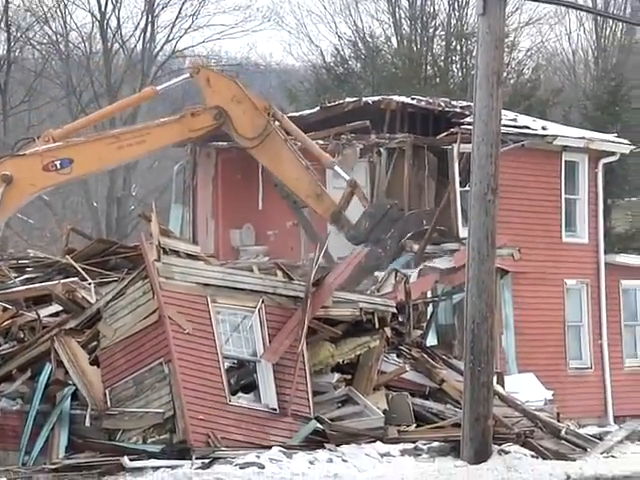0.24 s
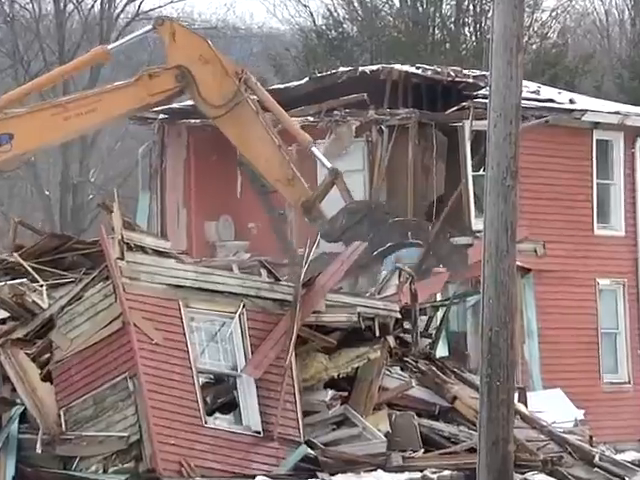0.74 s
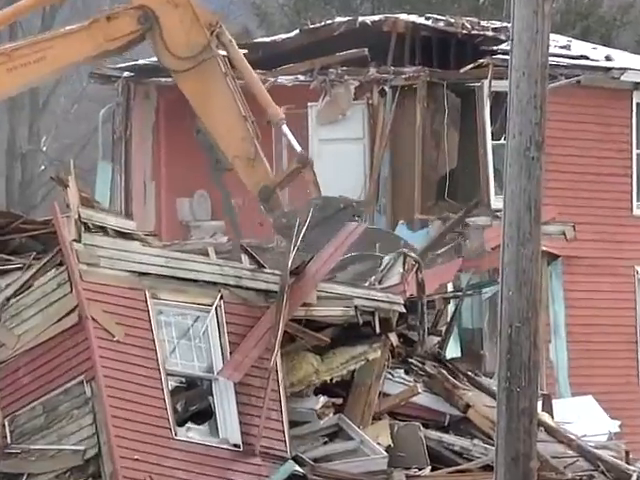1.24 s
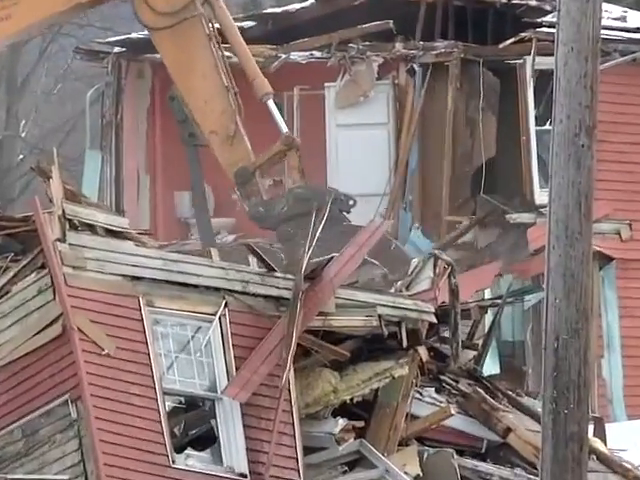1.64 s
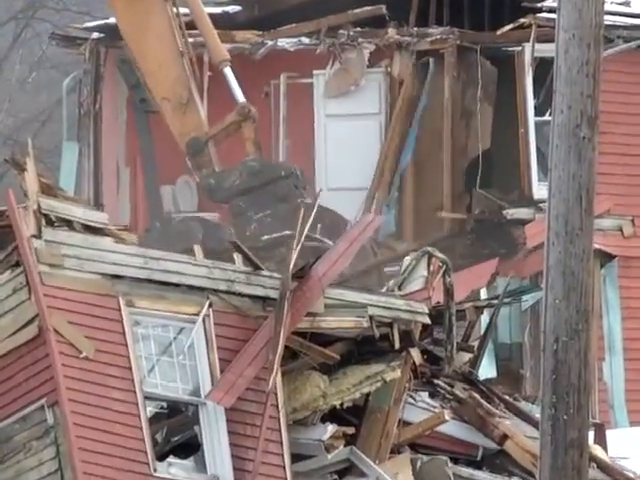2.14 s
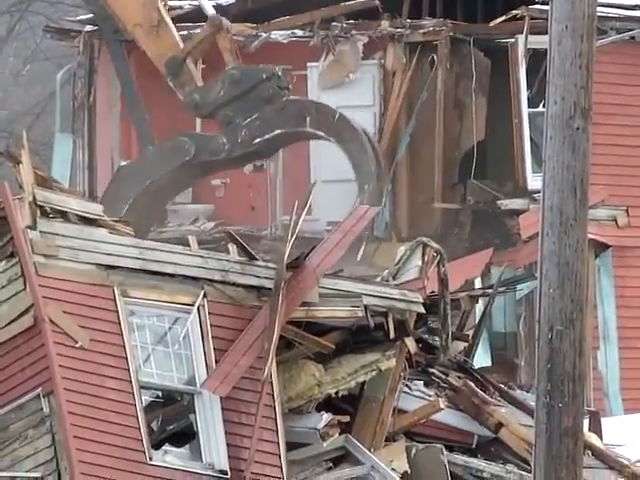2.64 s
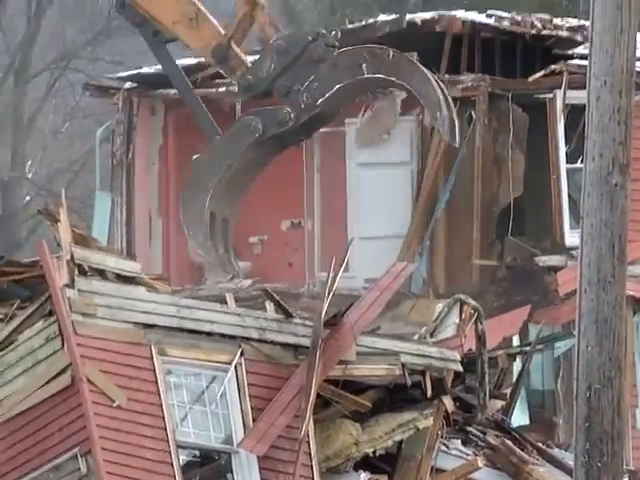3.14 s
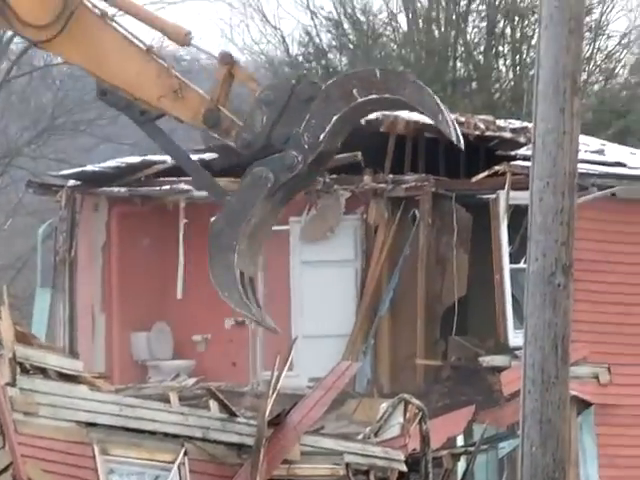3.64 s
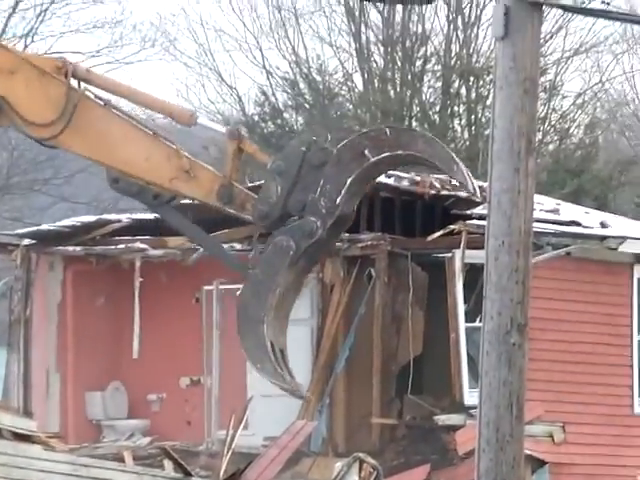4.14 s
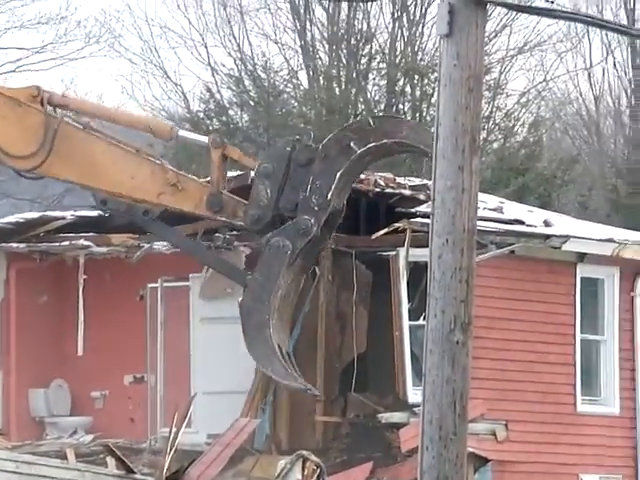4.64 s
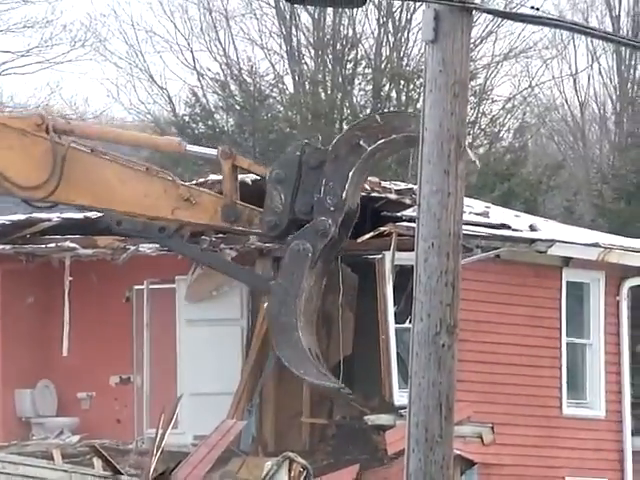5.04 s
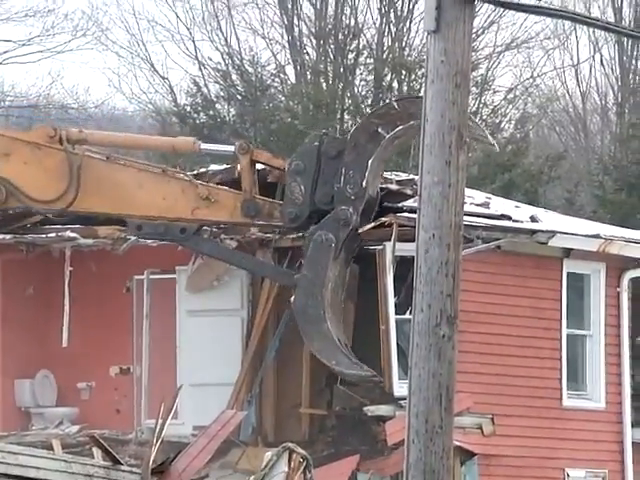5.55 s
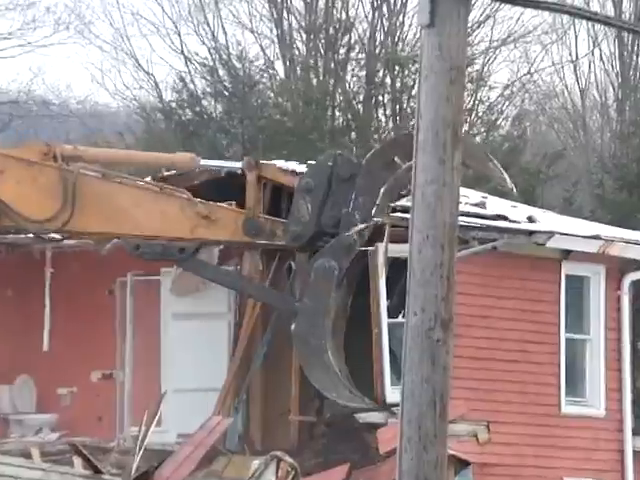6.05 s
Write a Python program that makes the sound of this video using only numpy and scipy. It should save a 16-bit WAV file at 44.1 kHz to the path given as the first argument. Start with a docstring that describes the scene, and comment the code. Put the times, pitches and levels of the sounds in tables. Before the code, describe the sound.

A diesel excavator works outdoors across a street, its steady rough roar of fan, exhaust and engine filling the whole stretch over low rumble, with faint treble clatter and hiss. At 0.3 s timber breaks very loudly: a cluster of hard, bright cracks with grainy crunching. Wooden knocks and sliding boards tumble on until about 1.2 s, with heavy soft thuds around 0.9 and 1.1 s and a last crack slightly left. At 1.64 s a tiny, dry splinter snaps close on the right. Then mostly machine: from 2.4 s a hydraulic moan near 900 Hz and a pump whine near 600 Hz waver and swell. Between 4.15 and 4.7 s duller boards knock, slide and thump; a low thud comes at 5.2 s and one more knock at 5.4 s. The moan climbs slightly and strengthens as it ends at 6.3 s. Wide, drifting stereo image, treble slightly limited.

```python
"""Across a street from a wooden house, a diesel excavator works its grapple.
Exhaust, fan and engine roar are shaped noises; pump, firing and throb are sines; a hydraulic moan is narrow noise.
Boards break and tumble early, a few more later: bursts ring wooden modes, thuds are swelling sines.
One splinter snaps close by on the right. Two close microphone ports, widened electronically, give a drifting image."""
import sys
import numpy as np
from scipy import signal
from scipy.fft import rfft, irfft
from scipy.io import wavfile

SR = 44100
rng = np.random.default_rng(int(sys.argv[2]) if len(sys.argv) > 2 else 0)


def to_wav(s):
    """Save 16-bit WAV."""
    ch = np.atleast_2d(s).T  # columns
    pcm = np.round(np.clip(ch, -1, 1) * 32767)  # PCM
    wavfile.write(sys.argv[1], SR, pcm.astype(np.int16))


N = 278112


def amp(db):
    """Decibels to gain."""
    return 10 ** (np.asarray(db) / 20)


def rms_one(x):
    """Scale to rms 1."""
    return x / np.sqrt(np.mean(x ** 2) + 1e-20)


def in_time(rows):
    """Columns of a time table, interpolated at every sample."""
    time_s, *columns = np.transpose(rows)
    return [np.interp(np.arange(N) / SR, time_s, column) for column in columns]


def over_hz(points):
    """Frequency table at every FFT bin, interpolated over log frequency."""
    hz = np.maximum(np.arange(N // 2 + 1) * SR / N, 1)
    table = np.array(points)
    return np.interp(np.log(hz), np.log(table[:, 0]), table[:, 1])


def noise_pair(spectrum):
    """Two unrelated noises of one colour, rms 1, silent outside the table."""
    hz = np.arange(N // 2 + 1) * SR / N
    inside = (hz > spectrum[0][0]) & (hz < spectrum[-1][0])
    white = rng.standard_normal((2, N))
    return rms_one(irfft(rfft(white) * amp(over_hz(spectrum)) * inside, N))


def drift(rate_hz):
    """Slow chance, rms 1: white noise through a double one-pole low-pass."""
    r = np.exp(-2 * np.pi * rate_hz / SR)
    white = rng.standard_normal(N + SR)
    return rms_one(signal.lfilter([1], [1, -2 * r, r * r], white)[SR:])   # first second lets it settle


def wandering_band(hz, width_hz):
    """Two noises in a narrow band: slow chance on a carrier that follows hz."""
    phase = 2 * np.pi * np.cumsum(hz) / SR
    strands = [drift(width_hz) * np.cos(phase) + drift(width_hz) * np.sin(phase) for _ in range(2)]
    return rms_one(np.array(strands))


def ring(clicks, hz, t60_s):
    """Two-pole resonance: a unit click starts a decaying sine of initial height 1."""
    r = amp(-60 / (t60_s * SR))
    w = 2 * np.pi * hz / SR
    return signal.lfilter([0, np.sin(w)], [1, -2 * r * np.cos(w), r * r], clicks + 1e-18)


def swell(start_s, level_db, hold_s, rise_s, fade_s):
    """Gain that climbs 20 dB per rise time, holds, and sinks 20 dB per fade time."""
    t = np.arange(N) / SR - start_s
    rise_db = 20 * np.maximum(-t / rise_s, 0)
    fade_db = 20 * np.maximum((t - hold_s) / fade_s, 0)
    return amp(level_db - rise_db - fade_db)


def ports(pair, width_db, share, turn_rad=0):
    """Port sum and raw difference: part of the difference follows the sum, the rest is scattered sound."""
    total, scattered = pair
    share = np.clip(share, 0, 1)
    quarter = irfft(1j * rfft(total), N) if np.any(turn_rad) else 0   # sum, a quarter cycle ahead
    direct = np.cos(turn_rad) * total + np.sin(turn_rad) * quarter
    difference = share * direct + np.sqrt(1 - share ** 2) * scattered
    return np.array([total, amp(width_db) * difference])


# engine levels: (time [s], exhaust [dB], low roar [dB], high roar [dB], clatter [dB])
ENGINE_LEVELS = [(0.0, -31.5, -23.5, -27.5, -42.5), (0.24, -31.5, -24.5, -33, -43.5),
                 (0.49, -27, -23.5, -28, -40.5), (0.79, -32, -27, -29, -44),
                 (.93, -33.5, -26.5, -27.5, -39), (1.09, -31.5, -24, -27.5, -41),
                 (1.23, -31, -25.5, -30.5, -44.5), (1.63, -33.5, -27.5, -32, -48.5),
                 (2.58, -35, -24, -28.5, -49), (2.91, -35, -23, -28, -48.5),
                 (3.39, -33.5, -22.5, -26, -46.5), (3.76, -33, -22.5, -24, -46),
                 (4.13, -30, -21, -23.5, -45.5), (4.46, -28.5, -21.5, -28.5, -43),
                 (4.81, -30, -24, -28.5, -45.5), (5.09, -32.5, -25, -26.5, -47.5),
                 (5.41, -32, -22.5, -26, -44), (5.8, -32.5, -22.5, -24, -44), (6.31, -30, -22, -21, -44)]
FIRING_HZ, FIRING_GATE = 100.6, 0.065   # gate: depth of the roar's breathing


def engine():
    """Exhaust, roar and clatter noises over low tones; roar and clatter breathe with each firing."""
    exhaust_db, low_db, high_db, clatter_db = in_time(ENGINE_LEVELS)
    t = np.arange(N) / SR
    firing = np.sin(2 * np.pi * (FIRING_HZ * t + 0.1 * drift(2.0)))
    gate = (1 + FIRING_GATE * firing) * amp(0.63 * drift(43))
    return (roar(low_db, high_db, clatter_db, gate) + clatter(clatter_db, gate) + hiss(clatter_db)
            + bass(exhaust_db) + engine_tones(firing))


# image drift: (time [s], low roar width [dB], high roar width [dB], share following the sum [0-1], phase turn [rad])
IMAGE_DRIFT = [(0, 2, 7, 0.02, 0.54), (.8, 1.5, 1.5, .25, -0.44), (1.4, 3.5, 5, 0.22, -0.22),
               (2.1, -0.5, 4, 0.5, -0.67), (3, -5, 1.5, 0.65, -0.96), (3.8, -4, -2, .25, -0.46),
               (4.2, -0.5, 0, 0, 0.7), (4.5, 2.5, 6, 0.4, 0.9), (5, 1, 1, 0.37, .22),
               (5.7, 4, 0.5, 0.2, 0.45), (6.31, -1.5, -5, 0.09, 0.22)]
# noise spectra: (frequency [Hz], relative density [dB per Hz])
LOW_ROAR_SPECTRUM = [(280, -17.5), (400, -6.5), (500, -6), (600, -3.5), (700, -4.5), (900, -1.5),
                     (1200, -2.5), (1500, -10.5), (2000, -70)]
HIGH_ROAR_SPECTRUM = [(900, -10.5), (1200, -9), (1450, 0.5), (1680, 0), (1850, -7), (2100, -10),
                      (2600, -59)]
UPPER_ROAR_SPECTRUM = [(1600, -12), (1900, 0.5), (2260, 1), (2580, -5.5), (2800, -14), (3300, -23)]
UPPER_DB = 1   # over the mean of high roar and clatter levels


def roar(low_db, high_db, clatter_db, gate):
    """Fan and engine noise in three bands; the hydraulic moan shares the low band's image."""
    low_width_db, high_width_db, share, turn_rad = in_time(IMAGE_DRIFT)
    low = amp(low_db) * noise_pair(LOW_ROAR_SPECTRUM) * gate + moan() + strand()
    upper_db = UPPER_DB + (high_db + clatter_db) / 2   # top of the roar dulls together with the clatter
    high = amp(high_db) * noise_pair(HIGH_ROAR_SPECTRUM)
    upper = amp(upper_db) * noise_pair(UPPER_ROAR_SPECTRUM)
    return ports(low, low_width_db, share, turn_rad) + ports((high + upper) * gate, high_width_db, share, turn_rad)


# rough hydraulic moan: (time [s], pitch [Hz], level of the wide band [dB])
MOAN_CURVE = [(0, 878, -47), (1.2, 873.5, -36.5), (2.3, 920, -48), (2.43, 910, -30), (2.6, 910, -52),
              (2.76, 920, -29), (2.9, 900, -32), (3.05, 895, -29), (3.17, 935, -29), (3.3, 955, -27),
              (3.4, 930, -36), (3.48, 920, -30.5), (3.6, 951, -24.5), (3.75, 880, -34), (3.95, 930, -25),
              (4.08, 899, -26.5), (4.2, 968, -29.5), (4.35, 958, -32.5), (4.48, 928, -31), (4.6, 960, -29),
              (4.75, 880, -30.5), (5.0, 902, -32.5), (5.2, 958, -31), (5.35, 922, -26), (5.52, 910, -26.5),
              (5.62, 996, -33), (5.75, 945.5, -26), (5.95, 1005, -34), (6.1, 968, -53), (6.22, 1014, -28.5),
              (6.31, 1026, -22.5)]
MOAN_WIDTH_HZ = 69
MOAN_CORE_HZ, MOAN_CORE_DB = 25, -5   # narrower strand: width, level re wide band


def moan():
    """Hydraulic moan: a wide and a narrow noise band around one gliding pitch."""
    moan_hz, moan_db = in_time(MOAN_CURVE)
    wide = wandering_band(moan_hz, MOAN_WIDTH_HZ)
    core = amp(MOAN_CORE_DB) * wandering_band(moan_hz, MOAN_CORE_HZ)
    return amp(moan_db) * (wide + core)


# higher strand under load: (time [s], pitch [Hz], level [dB])
STRAND_CURVE = [(0, 1076, -60), (3.3, 1017, -34), (3.46, 1020, -29), (3.62, 988, -36), (3.7, 1070, -49),
                (3.9, 1084, -34), (4.1, 1108, -49), (5.05, 1007, -42), (5.17, 1015, -24.5),
                (5.28, 1090, -33), (5.39, 1122, -33), (5.46, 1060, -28), (5.55, 1120, -31),
                (5.62, 1080, -27), (5.68, 1113, -52), (5.77, 1110, -39), (6.31, 1100, -48)]
STRAND_WIDTH_HZ = 19


def strand():
    """Higher strand that joins the moan under load: one narrow gliding noise band."""
    strand_hz, strand_db = in_time(STRAND_CURVE)
    return amp(strand_db) * wandering_band(strand_hz, STRAND_WIDTH_HZ)


# valve gear: (frequency [Hz], relative density [dB per Hz])
CLATTER_SPECTRUM = [(2300, -21), (2700, -1), (3200, 11.5), (4000, 5.5), (4700, -4), (5300, -5), (5800, -11),
                    (6300, -14.5), (7000, -50), (8500, -45)]
CLATTER_WIDTH_DB = 2.5


def clatter(clatter_db, gate):
    """Valve gear: treble noise gated by the firing."""
    return ports(amp(clatter_db) * noise_pair(CLATTER_SPECTRUM) * gate, CLATTER_WIDTH_DB, 0.75)


# hiss: (frequency [Hz], relative density [dB per Hz])
HISS_SPECTRUM = [(5000, -9), (6200, 2.5), (7500, 10), (9000, 7), (10800, 9), (12500, 8), (15200, 10.5),
                 (16500, 3)]
HISS_DB, HISS_FOLLOWS = -58, 0.41   # share of the clatter's level changes in dB


def hiss(clatter_db):
    """High noise that partly follows the clatter level."""
    level_db = HISS_DB + HISS_FOLLOWS * (clatter_db - clatter_db.mean())
    return ports(amp(level_db) * noise_pair(HISS_SPECTRUM), -1.5, 0.12)


# spectra: (frequency [Hz], relative density [dB per Hz])
EXHAUST_SPECTRUM = [(76, -20), (130, -3.5), (150, 1), (204, 2), (322, -4.5), (400, -6.5), (520, -12.5),
                    (880, -120)]
RUMBLE_SPECTRUM = [(14, -32), (22, -17), (34, -7), (44, -9), (56, 3.5), (66, -3), (76, 0), (90, -2.5),
                   (124, -3.5), (135, -10), (170, -15), (290, -100)]
# ground rumble: (time [s], level [dB])
RUMBLE_CURVE = [(0.0, -37.5), (1.05, -31.5), (1.58, -40), (2.62, -34), (3.13, -39), (3.44, -34.5),
                (4.0, -36.5), (5.6, -33.5), (6.31, -37.5)]
RUMBLE_WAVER_DB = 1


def bass(exhaust_db):
    """Exhaust noise over ground rumble with a wavering level."""
    rumble_db = in_time(RUMBLE_CURVE)[0] + RUMBLE_WAVER_DB * drift(3.4)
    rumble = amp(rumble_db) * noise_pair(RUMBLE_SPECTRUM)
    return ports(rumble + amp(exhaust_db) * noise_pair(EXHAUST_SPECTRUM), -0.93, 0.44)


FIRING_DB = -39.5
THROB_HZ, THROB_DB = 27.2, -41.5


def engine_tones(firing):
    """Firing tone and a slow low hum, both unsteady in level and phase."""
    t = np.arange(N) / SR
    firing_tone = amp(FIRING_DB + 1.1 * drift(5.0)) * firing
    throb = np.sin(2 * np.pi * (THROB_HZ * t + 0.09 * drift(1.4)))
    throb = amp(THROB_DB + 3.7 * drift(1.8)) * throb
    return np.sqrt(2) * (firing_tone + throb) * [[1], [.45]]   # levels are rms in the sum


# pump whine: (time [s], second multiple of piston rate [Hz], its level [dB])
PUMP_CURVE = [(0, 597, -38), (1.9, 598, -44.5), (1.97, 598, -36), (2.26, 598, -34), (2.41, 598, -43),
              (2.5, 600, -31.5), (2.6, 599, -40), (2.76, 598, -26.5), (2.85, 598, -37), (2.92, 596, -63),
              (3.03, 586, -31.5), (3.25, 586, -35), (3.42, 594, -40), (3.55, 600, -30.5), (3.8, 594, -48),
              (3.98, 587, -31), (4.2, 592, -43), (4.36, 602, -27), (4.55, 598, -41), (4.72, 596, -42),
              (4.79, 596, -32.5), (4.9, 597, -41), (5, 597, -35), (5.06, 597, -51), (5.14, 598, -28.5),
              (5.3, 594, -36), (5.45, 590, -34), (5.62, 598, -37), (5.76, 596, -35), (5.88, 592, -29.5),
              (5.94, 594, -43), (6.02, 596, -26), (6.18, 594, -45), (6.31, 590, -21)]
PISTON_DB, PUMP_WAVER_DB = -42.5, 1.8


def pump():
    """Piston rate of the hydraulic pump and its second multiple, wavering in level."""
    second_hz, second_db = in_time(PUMP_CURVE)
    phase = 2 * np.pi * (np.cumsum(second_hz / 2) / SR + 0.05 * drift(7.5))
    second = amp(second_db + PUMP_WAVER_DB * drift(17)) * np.sin(2 * phase)
    first = amp(PISTON_DB + PUMP_WAVER_DB * drift(2.4)) * np.sin(phase)
    return np.sqrt(2) * (first + second) * [[1], [.6]]


# breaking timber: (time [s], peak before pan [dB], pitch struck hardest [Hz], pan, left over right [dB])
TIMBER_BLOWS = [(.285, -15, 1300, -4), (0.3153, -1, 1560, -2), (0.322, -24, 1300, -4),
                (0.3265, -2, 1600, 0), (.3312, -1.5, 750, -3), (.340, -3.5, 620, -1), (.349, -20, 500, -3),
                (0.359, -6.5, 1110, -6), (0.3665, -6, 1000, -1), (0.385, -10, 750, -4),
                (.398, -12, 520, -4), (0.421, -19, 520, -1), (.428, -12, 1050, 0), (0.455, -12, 480, 0),
                (.505, -13, 500, -2), (.524, -6, 600, -2), (0.581, -13, 500, -2), (0.5965, -12, 1900, 2),
                (.605, -14, 800, -1), (.619, -15, 500, -2), (.635, -8.5, 446, -1), (0.6565, -9, 1580, -1),
                (.665, -16, 1900, 0), (0.679, -20, 1100, 0), (0.731, -10, 1080, 1), (.787, -15, 1450, 1),
                (.831, -8.5, 410, -4), (.910, -12, 560, -2), (.973, -19, 1450, -1), (.997, -17, 520, -4),
                (1.048, -14, 1300, -5), (1.137, -9.5, 1500, 4), (1.147, -21, 1840, 6),
                (1.157, -8.5, 1550, 5), (1.167, -19, 1550, 12), (4.16, -9, 700, -2), (4.35, -21, 594, -3),
                (4.43, -9, 650, 0), (4.56, -13, 959, 0), (4.68, -10, 1080, 3), (5.3585, -7, 1030, 0)]
# timber modes: (frequency [Hz], level [dB], t60 [s])
TIMBER_MODES = [(252, -10, 0.028), (420, -2.5, 0.084), (540, 1, 0.05), (700, 3.5, 0.024), (1080, 5.5, 0.03),
                (1547, 6.5, 0.038), (1860, 3, 0.011), (2320, 5, 0.022), (3350, -8, 0.0075),
                (4060, -20, .007), (5540, -14, 0.0044)]
HARD_HZ, SOFTER_DB_PER_OCTAVE = 5000, 10.5   # low-pass at 0 dB peak; an octave lower per 10.5 dB weaker
PITCH_SPREAD, UNEVEN_DB = 0.013, 1.5   # relative pitch spread of boards, spread of mode strengths
FOCUS_DB_PER_OCTAVE = -17   # modes away from the pitch struck ring less
SPLINTERING_S, SPLINTERING_DB = .0025, -21   # decay constant, level re first contact


def blows():
    """Breaking boards: contact and short splintering burst into the timber's modes, weaker ones duller."""
    out, length = np.zeros((2, N)), SR // 5
    t = np.arange(length) / SR
    for time_s, peak_db, struck_hz, pan_db in TIMBER_BLOWS:
        pitch = 1 + PITCH_SPREAD * rng.standard_normal()
        burst = amp(SPLINTERING_DB) * rng.standard_normal((2, length)) * np.exp(-t / SPLINTERING_S)
        burst[0, 0] += 1   # first contact
        burst[1] = 0.65 * burst[0] + 0.15 * burst[1]   # sides partly alike
        body = np.zeros((2, length))
        for hz, db, t60_s in TIMBER_MODES:
            focus_db = FOCUS_DB_PER_OCTAVE * abs(np.log2(hz / struck_hz))
            mode_db = db + focus_db + UNEVEN_DB * rng.standard_normal()
            body += amp(mode_db) * ring(burst, hz * pitch, t60_s)
        soften_hz = HARD_HZ * 2 ** (peak_db / SOFTER_DB_PER_OCTAVE)
        body = signal.sosfilt(signal.butter(4, soften_hz, fs=SR, output="sos"), body)
        hit = body / np.abs(body).max()
        at = round(time_s * SR)
        out[:, at:at + length] += amp(peak_db) * hit * amp([[pan_db / 2], [-pan_db / 2]])
    return out


# bright cracks: (time [s], tearing level before the rings [dB])
CRACK_TIMES = [(.3155, -48), (.3268, -37), (.3295, -35), (.345, -46), (.367, -48)]
# crack modes: (frequency [Hz], level [dB], t60 [s], sides [1 = alike, -1 = opposed])
CRACK_RINGS = [(3350, -2, .005, 1), (4000, -5, .005, 1), (5700, -12, .004, 1), (6800, -19, .004, 1),
               (9000, -21, .005, 1), (9400, -10, .006, -1), (10700, -4, .006, -1), (15000, -30, .003, 1)]
CRACK_S = .002   # decay constant of the tearing


def cracks():
    """Bright cracks: spurts of tearing noise into short high rings."""
    t = np.arange(N) / SR
    spurts = sum(amp(db) * (t >= time_s) * np.exp(-np.maximum(t - time_s, 0) / CRACK_S)
                 for time_s, db in CRACK_TIMES)
    tearing = spurts * rng.standard_normal(N)
    return sum(amp(db) * ring(tearing, hz, t60_s) * np.array([[1], [sides]])
               for hz, db, t60_s, sides in CRACK_RINGS)


# splinter modes: (frequency [Hz], level [dB], t60 [s])
SPLINTER_RINGS = [(2000, 0, .005), (2650, 5, .005), (3650, 1, .005), (4450, -7, .005), (5500, -14, .004),
                  (6500, -22, .004), (7900, -10, .005), (9100, -4, .005), (10200, 1, 0.005),
                  (12500, -22, .003), (15000, -24, .003)]
SPLINTER_S, SPLINTER_DB, SPLINTER_PAN_DB = 1.6364, -2, -8   # time, gain, left re right
SWELL_S, DYING_S = .0011, .0004   # time constants
TONE_HZ, TONE_HOLD_S, NOISE_DB = 2300, .0009, -5   # tone pitch and hold, peak of the rung noise


def splinter():
    """Close snap: noise and a short 2.3 kHz tone swell over a few milliseconds, then stop."""
    t = np.arange(N) / SR - SPLINTER_S
    rise = np.exp(np.minimum(t, 0) / SWELL_S)
    noise = rng.standard_normal(N) * rise * np.exp(-np.maximum(t, 0) / DYING_S)
    tone = rise * np.exp(-np.maximum(t - TONE_HOLD_S, 0) / DYING_S) * np.sin(2 * np.pi * TONE_HZ * t)
    rung = sum(amp(db) * ring(noise, hz, t60_s) for hz, db, t60_s in SPLINTER_RINGS)
    snap = amp(NOISE_DB) * rung / np.abs(rung).max() + tone
    # widening turns the far channel over
    return amp(SPLINTER_DB) * snap * np.array([[-amp(SPLINTER_PAN_DB)], [1]])


# fibre noise: (frequency [Hz], relative density [dB per Hz])
CRUNCH_SPECTRUM = [(700, -5), (1200, 6.5), (2000, 1.5), (2700, -15), (3600, -14.5), (5000, -26),
                   (6500, -30), (9000, -50), (13000, -51)]
# crunches: (start [s], level [dB], hold [s], rise per 20 dB [s], fade per 20 dB [s])
CRUNCH_SWELLS = [(.322, -18, 0.014, 0.014, 0.054), (.355, -30, .015, 0.011, .06),
                 (.42, -27, .015, .01, .05), (.583, -28, .022, .01, .03), (.652, -27, 0.016, 0.0092, 0.03),
                 (.731, -28, .01, .003, .03), (1.137, -27, 0.026, .005, 0.053)]


def crunch():
    """Broad grainy noise while fibres give way."""
    flow = sum(swell(*row) for row in CRUNCH_SWELLS) * amp(4.3 * drift(150))
    return ports(flow * noise_pair(CRUNCH_SPECTRUM), -5, 0.43)


# sliding boards: (start [s], level [dB], hold [s])
BOARD_SLIDES = [(0.327, -22, 0.074), (.6, -31.5, .06), (0.836, -29.5, 0.025), (0.962, -32.5, 0.2),
                (4.301, -29.5, 0.17)]
SLIDE_RISE_S, SLIDE_FADE_S = 0.062, 0.36   # per 20 dB
TRICKLE_DB = -47.5   # grit that never stops
KNOCKS_PER_S, HOLLOW_HZ, HOLLOW_DB = 900, 543, -20   # rate per channel, strongest pitch, change per octave away


def tumble():
    """Sliding heap: dense knocks of uneven size dealt to ten short wooden rings, dulled by distance."""
    size_db = 3.0 * np.minimum(rng.exponential(1, (2, N)), 3.3)
    sizes = amp(size_db) * rng.choice([-1, 1], (2, N))
    knocks = sizes * (rng.random((2, N)) < KNOCKS_PER_S / SR)
    dealt = rng.integers(0, 10, (2, N))
    rings = np.zeros((2, N))
    for k, hz in enumerate(np.geomspace(330, 2600, 10)):
        hollow_db = HOLLOW_DB * abs(np.log2(hz / HOLLOW_HZ))
        rings += amp(hollow_db) * ring(knocks * (dealt == k), hz, 18.0 / hz)
    dull = signal.sosfilt(signal.butter(4, 3800, fs=SR, output="sos"), rings)
    flow = amp(TRICKLE_DB) + sum(swell(*slide, SLIDE_RISE_S, SLIDE_FADE_S) for slide in BOARD_SLIDES)
    return ports(flow * rms_one(dull), -1.5, 0.33)


# heavy landings: (time [s], level before swell and decay [dB], pitch [Hz], t60 [s])
GROUND_THUDS = [(0.314, -7, 162, 0.13), (0.601, -15.5, 171, 0.2), (0.676, -19, 150, .1),
                (.84, -18, 79.5, 0.27), (.87, -14, 96, 0.21), (.903, -6.5, 102.6, 0.16),
                (0.928, -11, 114.7, 0.2), (.96, -14, 126.4, 0.22), (1.0, -23, 71, 0.32),
                (1.029, -19, 107, .2), (1.09, -8, 101, 0.14), (4.262, -9.5, 150, 0.13),
                (4.381, -11.5, 238, 0.21), (4.441, -14, 264, 0.16), (4.5, -22, 151, 0.12),
                (4.62, -13, 195, 0.17), (4.701, -18, 230, .12), (5.16, -15, 72.3, 0.17),
                (5.529, -15, 99.8, .13)]


def thuds():
    """Heavy pieces landing: each a low sine that swells while it dies, cut after 250 ms."""
    t = np.arange(N) / SR
    out = np.zeros(N)
    for time_s, level_db, hz, t60_s in GROUND_THUDS:
        at = slice(round(time_s * SR), round(time_s * SR) + SR // 4)
        age = t[at] - time_s
        onset = 1 - np.exp(-age / 0.032)
        out[at] += amp(level_db - 60 * age / t60_s) * onset * np.sin(2 * np.pi * hz * age)
    return out


# high noise band: (frequency [Hz], relative density [dB per Hz])
HIGH_BAND_SPECTRUM = [(8200, -24), (9600, -2), (10800, 3), (11600, 0), (13000, -25)]
# high noise band: (time [s], level [dB])
HIGH_BAND_CURVE = [(0, -63), (1, -61), (2.2, -66.5), (4, -68), (4.3, -58.5), (4.9, -66), (6.31, -61)]


def high_band():
    """Wide high noise band, 9 to 12 kHz, with slowly changing level."""
    return ports(amp(in_time(HIGH_BAND_CURVE)[0]) * noise_pair(HIGH_BAND_SPECTRUM), 3.5, .4)


# lift of the port difference: (frequency [Hz], gain [dB])
WIDTH_LIFT = [(60, -28), (99, -15.5), (160, -20), (270, -12.5), (450, -12), (740, -5), (1220, 2),
              (2010, 5.5), (3330, 5), (5500, 8.5), (9080, 7.5), (15000, 4.5)]
# phase lead of the difference: (frequency [Hz], lead [rad])
PHASE_LEAD = [(60, 0), (300, 1.5), (800, 1.5), (1400, 0.05), (2000, 0), (2700, -19), (3500, -6), (4800, -5),
              (16000, -5.5)]


def widen(total, difference):
    """Electronic widening: difference lifted towards the treble, phase-shifted, matrixed to left and right."""
    filter_response = amp(over_hz(WIDTH_LIFT)) * np.exp(1j * over_hz(PHASE_LEAD))
    side = irfft(rfft(difference) * filter_response, N)
    return np.array([total + side, total - side])


def scene():
    """Machine and rubble through the port pair; blows, cracks, thuds and splinter straight to left and right."""
    through_ports = engine() + pump() + crunch() + tumble() + high_band()
    return widen(*through_ports) + blows() + cracks() + splinter() + thuds()


# cancellations in the microphone housing: (frequency [Hz], width [Hz])
HOUSING_NOTCHES = [(2850, 160), (5000, 210)]
LINE_HZ, LINE_DB = 15734, -77   # thin electronic whistle
CUTOFF_HZ = 15850


def record(dry):
    """Two notches, a faint whistle stronger on the left, rounded peaks, the top cut."""
    for hz, width_hz in HOUSING_NOTCHES:
        dry = signal.lfilter(*signal.iirnotch(hz, hz / width_hz, fs=SR), dry)
    whistle = amp(LINE_DB) * np.sqrt(2) * np.sin(2 * np.pi * LINE_HZ * np.arange(N) / SR)
    rounded = 1.5 * np.tanh((dry + whistle * [[1.5], [.5]]) / 1.5)
    return signal.sosfilt(signal.ellip(12, .3, 80, CUTOFF_HZ, fs=SR, output="sos"), rounded)


dry = scene()
out = record(dry)
to_wav(out)
```